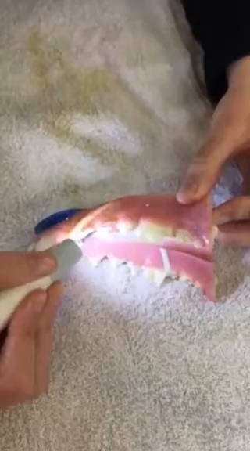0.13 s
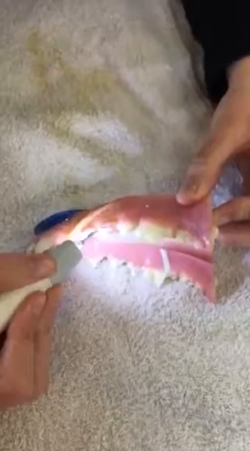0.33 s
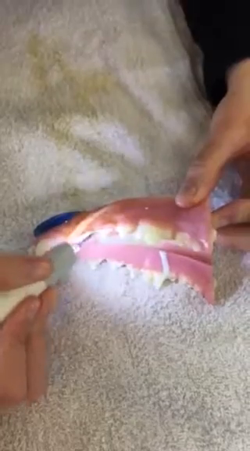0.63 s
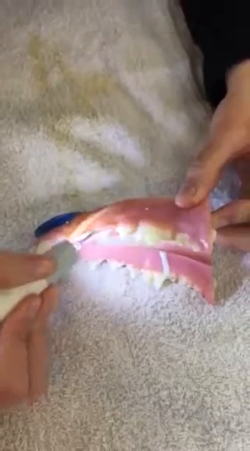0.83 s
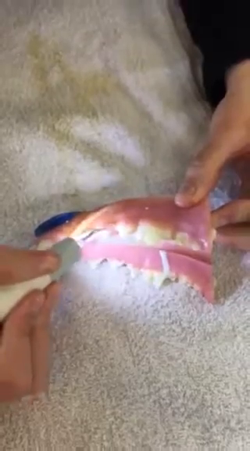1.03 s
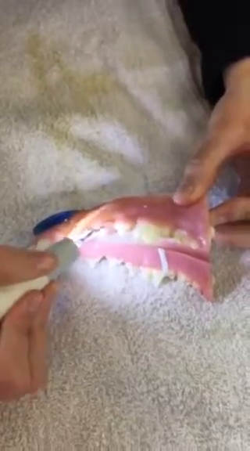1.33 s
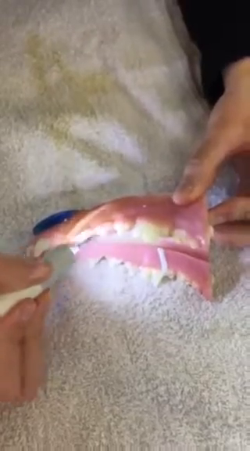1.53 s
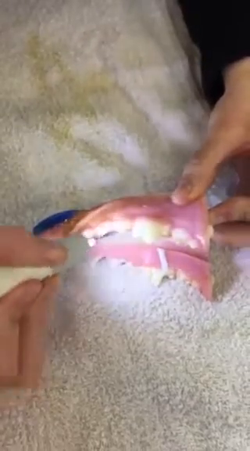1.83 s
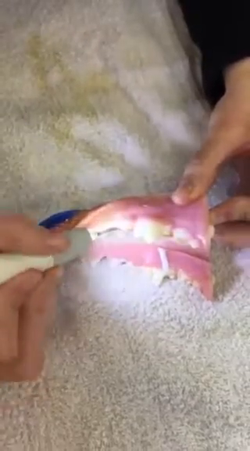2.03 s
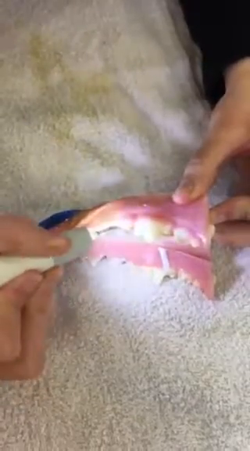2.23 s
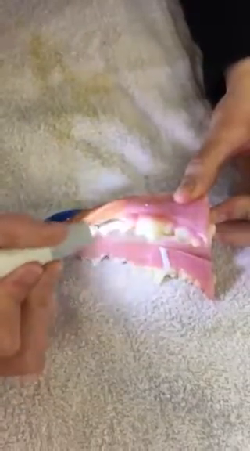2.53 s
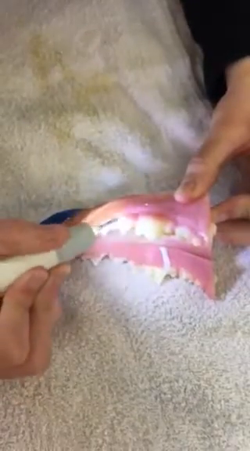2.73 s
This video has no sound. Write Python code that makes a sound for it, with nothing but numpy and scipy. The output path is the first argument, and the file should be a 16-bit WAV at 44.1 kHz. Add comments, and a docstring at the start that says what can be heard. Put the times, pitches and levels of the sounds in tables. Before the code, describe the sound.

Hissing, sputtering spray from an ultrasonic dental scaler, with short squeaks and soft handling bumps.

```python
"""An ultrasonic scaler works on a plastic tooth model lying on a towel, close to the microphone.
Its water spray hisses in a few resonances and spits about twenty times a second; water bubbles on the
model, and the tip squeals where it bites on a tooth. The hands rub and bump the model, brush over the
cloth and creak on the plastic, above a low room rumble."""
import sys
import numpy as np
from scipy import signal
from scipy.fft import rfft, irfft
from scipy.io import wavfile
from scipy.ndimage import map_coordinates

SR = 44100
rng = np.random.default_rng(int(sys.argv[2]) if len(sys.argv) > 2 else 0)


def digitize_waveform(pressure):
    """Quantize a signal to 16-bit integers and store it at the path in sys.argv[1].

    Rows of a 2-D input are taken as channels; values are limited to [-1, 1].
    """
    field = np.atleast_2d(pressure).T
    bounded = np.clip(field, -1, 1)
    quanta = np.round(bounded * 32767).astype(np.int16)
    wavfile.write(sys.argv[1], SR, quanta)


N = 127890
T = np.arange(N) / SR
FRAMES = dict(nperseg=1024, noverlap=768)


def amp(db):
    """Decibels to gain."""
    return 10 ** (np.asarray(db) / 20)


def unit(x):
    """Scales to rms 1."""
    return x / np.sqrt(np.mean(x ** 2) + 1e-20)


def fader(points):
    """Gain over time from (seconds, dB) points."""
    return amp(np.interp(T, *np.transpose(points)))


def add(mix, start, sound):
    """Mixes a sound in at start seconds."""
    part = mix[max(round(start * SR), 0):][:len(sound)]
    part += sound[:len(part)]


def noise(colour):
    """Noise of rms 1, shaped by (Hz, dB) points."""
    hz, db = np.transpose(colour)
    gain = amp(np.interp(np.log(np.fft.rfftfreq(N, 1 / SR) + 1), np.log(hz), db))
    return unit(irfft(rfft(rng.standard_normal(N)) * gain, N))


def drift(size, rate_hz):
    """Smooth random motion of rms about 1, up to about rate_hz."""
    padded = size + 8192
    hz = np.fft.rfftfreq(padded, 1 / SR)
    spectrum = rfft(rng.standard_normal(padded)) / (1 + (hz / rate_hz) ** 4)
    return unit(irfft(spectrum, padded))[:size]


def ring(hz, width_hz):
    """Noise in a resonance that follows the curve hz."""
    phase = 2 * np.pi * np.cumsum(hz) / SR
    return sum(drift(len(hz), width_hz / 2) * wave(phase) for wave in (np.cos, np.sin)) / np.sqrt(2)


def burst(t, length, rise_s, fall_s):
    """Attack, hold and exponential release."""
    return np.minimum(t / rise_s, 1) * np.exp(-np.maximum(t - length + fall_s / 2, 0) / fall_s)


def patchy(x, depth_db, width_hz, length_s):
    """Lets the colour of a sound shift in random patches of the given size."""
    hz, t, spectrum = signal.stft(x, SR, **FRAMES)
    grid = np.meshgrid(hz / width_hz, t / length_s, indexing="ij")
    patches = map_coordinates(rng.standard_normal((400, 400)), grid, order=3, mode="wrap")
    out = signal.istft(spectrum * amp(depth_db * np.minimum(patches, 1)), SR, **FRAMES)[1][:N]
    return unit(out) * np.std(x)


# Tone of the hiss. Each row: frequency in Hz, relative level in dB.
HISS_COLOUR = [(1000, -16), (2300, -11), (3000, -8), (3450, -9), (3900, -4), (4500, -2), (4900, -2),
               (5300, 2.5), (6250, -1), (6700, -4), (7500, -6), (8000, -9), (9000, -11), (10000, -20)]
# The spray's four resonances, low to high. Each row: centre in Hz, width in Hz.
SPRAY_RINGS = [(2950, 380), (5900, 620), (7140, 400), (8650, 950)]
# Swells of the hiss and of each resonance. Each row: time in seconds, relative level in dB.
HISS_FADER = [(0.0, -58.5), (0.11, -54), (0.44, -55.5), (0.46, -48), (0.54, -59.5), (1.16, -54.5),
              (1.18, -55), (1.19, -51), (1.57, -58), (2.47, -52.5), (2.6, -58), (2.9, -59)]
DEEP_FADER = [(0, -72), (.85, -72), (1.03, -59), (1.25, -72), (2.68, -72), (2.8, -58), (2.9, -62)]
LOW_FADER = [(0, -48.5), (.13, -48), (.42, -52.5), (.55, -44.5), (.78, -46.5), (1.15, -51), (1.25, -72),
             (1.53, -55.5), (1.8, -43.5), (2.0, -61), (2.25, -53), (2.5, -62), (2.65, -51), (2.9, -50.5)]
MID_FADER = [(0.0, -67), (0.51, -71), (0.62, -53), (1.1, -48), (1.17, -55.5), (1.61, -59), (1.65, -52.5),
             (1.84, -47.5), (1.86, -38), (1.87, -45.5), (2.08, -52), (2.19, -47.5), (2.56, -52),
             (2.65, -50), (2.75, -54), (2.9, -55)]
TOP_FADER = [(0, -57), (.08, -49.5), (.14, -54), (.19, -57), (.4, -58.5), (.52, -51), (.6, -70),
             (1.12, -67), (1.2, -50.5), (1.42, -54), (1.58, -53), (1.7, -67), (2.05, -62.5), (2.27, -64),
             (2.6, -65.5), (2.9, -58)]


def spray(hiss_db=3, rings_db=-0.5, wander_hz=30, flutter_db=1.7):
    """Fine mist: a fluttering hiss and four resonances that swell and wander as the tip moves."""
    hiss = fader(HISS_FADER) * patchy(noise(HISS_COLOUR), depth_db=3, width_hz=260, length_s=.06)
    rings = np.zeros(N)
    for swell, (hz, width) in zip((DEEP_FADER, LOW_FADER, MID_FADER, TOP_FADER), SPRAY_RINGS):
        rings += fader(swell) * ring(hz + wander_hz * drift(N, rate_hz=12), width)
    flutter = amp(flutter_db * drift(N, rate_hz=60))
    return (amp(hiss_db) * hiss + amp(rings_db) * rings) * flutter


# Steady notches in the treble. Each row: centre in Hz, width in Hz, gain in dB.
STEADY_NOTCHES = [(2680, 140, -4), (8000, 200, -3)]
# Drifting notches that give the hiss a hollow, swirling tone.
# Each row: time in seconds, centre in Hz, gain in dB.
HIGH_NOTCH = [(0, 6720, -18), (.5, 6650, -20), (.7, 6630, -22), (1.1, 6720, -16), (1.3, 6650, -3),
              (1.65, 6620, -13), (1.85, 6580, -10), (2.05, 6600, -2), (2.5, 6700, -1), (2.7, 6880, -3),
              (2.9, 6880, -4)]
MID_NOTCH = [(0, 4900, -6), (.31, 4830, -17), (.5, 4980, -14), (.7, 4920, -7), (.86, 4950, -11),
             (1.17, 4980, -3), (1.6, 4900, -3), (1.75, 4930, -13), (2.0, 4900, -3), (2.9, 4930, -5)]
LOW_NOTCH = [(0, 3400, -4), (.29, 3250, -17), (.43, 3400, -5), (.58, 3400, -17), (.71, 3300, -10),
             (.85, 3450, -4), (1.1, 3640, -14), (1.16, 3500, -1), (1.35, 3450, -2), (1.56, 3300, -10),
             (1.75, 3500, -3), (2.05, 3450, -2), (2.55, 3500, -7), (2.84, 3580, -16)]
# Upper edge of the spray. Each row: time in seconds, start of the roll-off in Hz.
TREBLE_EDGE = [(0, 8840), (.5, 9230), (.73, 9400), (.8, 8140), (1.1, 8650), (1.22, 9060), (1.58, 9040),
               (1.7, 8200), (1.85, 8930), (2.1, 8800), (2.9, 9200)]


def hollowed(x, edge_db_per_hz=0.1, max_rolloff_db=14):
    """Filters the hiss, spits and squeals with steady and drifting notches and a moving treble roll-off."""
    hz, t, spectrum = signal.stft(x, SR, **FRAMES)
    hz = hz[:, None]
    notches = list(STEADY_NOTCHES)
    for sweep, width_hz in ((HIGH_NOTCH, 190), (MID_NOTCH, 150), (LOW_NOTCH, 185)):
        times, centre, db = np.transpose(sweep)
        notches.append((np.interp(t, times, centre), width_hz, np.interp(t, times, db)))
    notch_db = sum(db * np.exp(-((hz - centre) / width) ** 2) for centre, width, db in notches)
    above_edge_hz = np.maximum(hz - np.interp(t, *np.transpose(TREBLE_EDGE)), 0)
    rolloff_db = np.minimum(edge_db_per_hz * above_edge_hz, max_rolloff_db)
    return signal.istft(spectrum * amp(notch_db - rolloff_db), SR, **FRAMES)[1][:N]


# Swell of the room rumble. Each row: time in seconds, level in dB.
RUMBLE_FADER = [(0, -48), (.07, -54.5), (.21, -48.5), (.29, -55), (.45, -51.5), (.6, -55), (.8, -50.5),
                (.95, -52), (1.12, -51), (1.2, -55.5), (1.33, -50), (1.45, -50.5), (1.56, -47),
                (1.7, -55.5), (1.85, -52.5), (2.0, -51), (2.2, -53.5), (2.45, -50), (2.53, -54.5),
                (2.72, -54.5), (2.9, -52)]
# Its tone. Each row: frequency in Hz, relative level in dB.
RUMBLE_COLOUR = [(20, -24.5), (35, -13), (50, -2), (72, 1.5), (120, -2), (200, -9.5), (400, -23),
                 (1000, -34.5), (3000, -60.5)]


def room_rumble():
    """A low bed of room noise that rises and sinks."""
    return fader(RUMBLE_FADER) * noise(RUMBLE_COLOUR)


# How busy the hands are; drives rub, patter and bubbles. Each row: time in seconds, relative level in dB.
HANDLING = [(0, -54), (.17, -57.5), (.35, -60.5), (.62, -59.5), (.8, -53.5), (.92, -60), (1.05, -47.5),
            (1.2, -61.5), (1.42, -51.5), (1.6, -55), (1.75, -68.5), (1.9, -54), (2.03, -50.5),
            (2.35, -50.5), (2.55, -51), (2.7, -59.5), (2.9, -54.5)]
# Tone of the rub. Each row: frequency in Hz, relative level in dB.
RUB_COLOUR = [(80, -9.5), (200, 1.5), (350, 0), (600, -5), (1100, -14.5), (2000, -17), (4000, -13.5),
              (9000, -44)]


def finger_rub(gain_db=-2, lumps_db=3):
    """Fingers rub unevenly on the model as they hold it."""
    rub = patchy(noise(RUB_COLOUR), depth_db=4.5, width_hz=130, length_s=.04)
    lumps = amp(lumps_db * drift(N, rate_hz=50))
    return amp(gain_db) * fader(HANDLING) * rub * lumps


def knock(drop_s, peak_s, top_hz=944, thud_hz=74):
    """A soft knock whose pitch drops quickly into a thud."""
    t = T[:3072]
    hz = thud_hz + (top_hz - thud_hz) * np.exp(-t / drop_s)
    envelope = t / peak_s * np.exp(1 - t / peak_s)
    return envelope * np.sin(2 * np.pi * np.cumsum(hz) / SR)


def patter(gain_db=6, taps_per_s=35):
    """Tiny random knocks, louder as the hands get busier."""
    taps = (rng.random(N) < taps_per_s / SR) * rng.uniform(-1, 1, N) * fader(HANDLING)
    return amp(gain_db) * signal.oaconvolve(taps, knock(drop_s=.003, peak_s=.002))[:N]


def blip(length, pitch, glide_per_s=2):
    """One bubble: a short, softly starting note that rises a little."""
    t = T[:3072]
    cycles = np.cumsum(pitch * np.exp(glide_per_s * (t - length / 2))) / SR
    return np.sqrt(2) * np.sin(2 * np.pi * cycles) * burst(t, length, rise_s=.005, fall_s=.006)


# Clear wet blips. Each row: start in seconds, length in seconds, pitch in Hz, level in dB.
BLIPS = [(.003, .018, 205, -43), (.052, .018, 610, -58), (.42, .014, 230, -54), (.605, .016, 800, -59),
         (.765, .016, 650, -58), (1.403, .03, 340, -52)]


def bubbles(faint_per_s=30, faint_db=-14, faint_s=.01, low_hz=220, high_hz=1000):
    """Water bubbles on the model: a few clear blips, and many faint ones that follow the handling."""
    out, stir = np.zeros(N), fader(HANDLING)
    for start, length, pitch, db in BLIPS:
        add(out, start, amp(db) * blip(length, pitch))
    for when, height, strength in rng.random((round(faint_per_s * N / SR), 3)):
        at = int(when * N)
        pitch = low_hz * (high_hz / low_hz) ** height
        gain = amp(faint_db) * stir[at] * 2 * strength * np.sqrt(low_hz / pitch)
        add(out, at / SR, gain * blip(faint_s, pitch))
    return out


# Spits of water. Each row: start in seconds, length in seconds, puff pitch in Hz,
# its relative level in dB, pop pitch in Hz, its relative level in dB.
SPITS = [(.006, .008, 4240, -50, 2100, -49), (.058, .008, 4100, -52, 2000, -52),
         (0.08, 0.016, 4020, -48, 2200, -53), (.118, .028, 4000, -47, 2050, -45),
         (0.181, 0.011, 3970, -49, 2500, -52), (0.382, .008, 4500, -48, 2600, -56),
         (0.413, 0.015, 4330, -49, 2600, -55), (0.531, 0.0086, 4600, -51, 2500, -50),
         (.562, .006, 4700, -48, 2400, -60), (0.619, 0.0092, 4500, -48, 2300, -55),
         (.65, .007, 4400, -48, 2500, -59), (0.674, .008, 4180, -53, 2000, -54),
         (0.723, 0.011, 4450, -48, 2350, -49), (0.763, 0.0068, 4600, -48, 2200, -46),
         (0.806, 0.0049, 4240, -47, 2100, -48), (0.841, 0.0074, 4040, -50, 1950, -51),
         (.885, 0.0074, 4570, -49, 2700, -52), (.904, .008, 4000, -52, 2250, -50),
         (0.928, 0.0086, 4630, -47, 2400, -50), (0.971, 0.01, 3860, -48, 3000, -54),
         (1.016, .008, 5500, -49, 3000, -48), (1.09, .008, 4200, -48, 2950, -51),
         (1.138, .008, 5320, -48, 2950, -51), (1.239, .012, 5030, -44, 2500, -51),
         (1.293, 0.008, 5200, -45, 2500, -51), (1.346, 0.014, 4890, -42, 2500, -48),
         (1.416, .008, 4740, -49, 2400, -52), (1.447, .008, 4410, -46, 2600, -52),
         (1.498, 0.0095, 4900, -45, 2450, -50), (1.588, 0.0094, 4700, -48, 2500, -52),
         (1.632, 0.009, 4850, -44, 3250, -45), (1.675, 0.019, 4540, -46, 2500, -52),
         (1.714, .034, 4050, -40, 3500, -49), (1.755, .008, 3980, -65, 2900, -57),
         (1.808, .006, 4300, -54, 2800, -53), (1.842, .026, 3700, -42, 2600, -48),
         (1.88, 0.0092, 3900, -43, 2700, -52), (1.942, 0.0056, 4800, -47, 2400, -48),
         (1.985, 0.01, 4650, -47, 2500, -52), (2.046, 0.0091, 4950, -44, 2600, -51),
         (2.127, 0.0073, 5080, -45, 2600, -52), (2.158, 0.013, 3900, -47, 2500, -53),
         (2.525, 0.0052, 4820, -40.5, 2400, -52), (2.567, .008, 4700, -49, 2400, -53),
         (2.648, .007, 4800, -42, 2150, -46), (2.661, .005, 5000, -44, 2300, -54),
         (2.693, 0.0068, 4070, -41, 2300, -54), (2.746, .01, 4500, -47, 2200, -53),
         (2.776, 0.0087, 4460, -47, 2100, -54), (2.827, .01, 4600, -42, 2250, -47),
         (2.871, .006, 4630, -45, 2100, -53)]
# Tone of the crackle inside each spit. Each row: frequency in Hz, relative level in dB.
CRACKLE_COLOUR = [(1200, -40), (2200, -15), (3000, -14), (3800, -2), (4500, 2), (5400, -2), (7300, -6),
                  (8500, -18)]


def spits(gain_db=-1, sag_per_s=6, pop_s=.007, crackle_db=-6, snaps_per_s=600, snap_s=.0005):
    """Drops burst off the tip: a puff in a sagging resonance, a lower pop and a faint crackle."""
    out, crackle_envelope, t = np.zeros(N), np.zeros(N), T[:2560]
    edges = dict(rise_s=.003, fall_s=.0025)
    for start, length, puff_hz, puff_db, pop_hz, pop_db in SPITS:
        sag = np.exp(-sag_per_s * (t - length / 2))
        envelope = amp(puff_db) * burst(t, length, **edges)
        puff = envelope * ring(puff_hz * sag, width_hz=820 + 9000 * length)  # long spits rasp wider
        pop = amp(pop_db) * ring(pop_hz * sag, width_hz=560) * burst(t, pop_s, **edges)
        add(out, start, puff + pop)
        add(crackle_envelope, start, envelope)
    triggers = 1. * (rng.random(N) < snaps_per_s / SR)
    snaps = signal.oaconvolve(triggers, np.exp(-t / snap_s))[:N]
    crackle = unit((.5 + snaps) * noise(CRACKLE_COLOUR))  # snaps over an even fizz
    return amp(gain_db) * out + amp(crackle_db) * crackle_envelope * crackle


# Bites of the tip. Each row: start in seconds, length in seconds, pitches of modes two to four in Hz,
# relative levels of all four modes in dB, extra rasp in dB.
SQUEALS = [(.115, .038, 4070, 6110, 8400, -62, -57, -53, -45, 0),
           (.235, .01, 4040, 5920, 8530, -56, -42, -37, -38, 0),
           (.286, .045, 3880, 5830, 8560, -57.5, -46, -42.5, -40.5, 1),
           (.301, .019, 4190, 5970, 8380, -45, -29, -27, -33, -2),
           (.341, .011, 4100, 6120, 8300, -68, -52, -37.5, -42, 0),
           (.447, .025, 4410, 5720, 8720, -62, -39, -39, -39, 7),
           (.455, .007, 4130, 5970, 8420, -54, -35, -28, -39, 4),
           (.461, .012, 4133, 5970, 8420, -55, -29, -34, -37, 4),
           (.492, .01, 3900, 5750, 8520, -55, -34, -35, -31, 6),
           (.496, .023, 4150, 6030, 8320, -57, -41, -28, -35, 2),
           (1.171, .0099, 3607, 4770, 8400, -66, -29.5, -40, -29, -2),
           (1.182, .023, 3640, 5970, 8370, -70, -59, -57, -45, -4)]
# Rasp around each mode, low to high. Each row: level against the tone in dB before the extra, width in Hz.
MODE_RASP = [(-3, 450), (-7, 720), (-13, 620), (-9, 850)]


def squeals(gain_db=-3.7, first_hz=2430, wander_hz=45, roughness=.41, chatter_db=1.3):
    """The tip chatters on a tooth: four wavering modes, each a tone with a rough skirt and wider rasp."""
    out, t = np.zeros(N), T[:4096]
    for start, length, second_hz, third_hz, fourth_hz, *mode_db, extra_db in SQUEALS:
        modes = np.zeros(len(t))
        mode_hz = (first_hz, second_hz, third_hz, fourth_hz)
        for hz, db, (rasp_db, rasp_width) in zip(mode_hz, mode_db, MODE_RASP):
            pitch = hz + wander_hz * drift(len(t), rate_hz=110)
            tone = np.sqrt(2) * np.sin(2 * np.pi * (np.cumsum(pitch) / SR + rng.random()))
            skirt = roughness * ring(pitch, width_hz=340)
            rasp = amp(rasp_db + extra_db) * ring(pitch, rasp_width)
            modes += amp(db) * unit(tone + skirt + rasp)
        chatter = amp(chatter_db * drift(len(t), rate_hz=250))
        add(out, start, modes * chatter * burst(t, length, rise_s=.0034, fall_s=.0052))
    return amp(gain_db) * out


# Strokes over the towel. Each row: start in seconds, rise in seconds, decay in seconds, level in dB.
BRUSHES = [(.13, .01, 0.039, -50.5), (0.881, 0.025, 0.042, -50), (1.0, .02, 0.066, -54),
           (1.39, 0.023, 0.022, -51), (1.97, 0.031, 0.28, -51), (2.238, .013, .044, -32),
           (2.31, 0.035, 0.055, -44.5), (2.419, .014, .052, -33.3)]
# Tone of the cloth. Each row: frequency in Hz, relative level in dB.
CLOTH_COLOUR = [(50, -22), (150, 6.5), (300, -1), (600, -.5), (1200, -3.5), (1800, -1), (2400, -4.5),
                (2900, -4), (3200, -14), (4300, -14.5), (6000, -20), (8600, -23), (9500, -36)]
# Resonances of the model and table. Each row: centre in Hz, width in Hz, relative level in dB.
BODY_RINGS = [(169.3, 36, -0.5), (329, 30, -0.5), (562, 19, -4.5), (702, 22, -4.5), (820, 20, -0.5),
              (960, 21, -3.5), (1033, 16, -3.5), (1500, 18, -2), (1636, 20, -3.5), (1687, 16, -6.5),
              (1978, 26, -3.5), (2090, 25, -1), (2468, 16, -4)]


def cloth_brushes(grain_db=2, body_db=-11):
    """Hands brush the cloth: grainy swishes that swell fast, ring in the model and table, and fade."""
    power = np.zeros(N)
    for start, rise, decay, db in BRUSHES:
        stroke = amp(db) * np.minimum(T / rise, 1) * np.exp(-np.maximum(T - rise, 0) / decay)
        add(power, start, stroke ** 2)
    cloth = patchy(noise(CLOTH_COLOUR), depth_db=4, width_hz=170, length_s=.025)
    body = sum(amp(db) * ring(np.full(N, hz), width) for hz, width, db in BODY_RINGS)
    grain = amp(grain_db * drift(N, rate_hz=170))
    return np.sqrt(power) * unit(cloth * grain + amp(body_db) * body)


# Knocks on the model. Each row: start in seconds, level in dB, time constant of the pitch drop in seconds.
BUMPS = [(.484, -45, .003), (.86, -42, 0.0026), (.882, -39.5, 0.0032), (.892, -40, .002),
         (0.906, -41, 0.0031), (.923, -42.5, 0.0036), (.932, -39.5, 0.00287), (1.019, -43, 0.0025),
         (1.285, -41, 0.0017), (1.296, -51, 0.0018), (1.41, -44, 0.0029), (1.497, -43, 0.0021),
         (1.587, -41.5, 0.0021), (1.634, -40, 0.0033), (1.979, -38.5, 0.0027), (1.993, -39, 0.0021),
         (2.15, -40.5, 0.0029), (2.182, -39, .003), (2.264, -40, .003), (2.441, -39, 0.0028),
         (2.59, -41, .003), (2.777, -36.5, 0.0029), (2.873, -41, 0.0026), (2.886, -37.5, 0.0027)]


def bumps():
    """The hands knock the model with soft thuds."""
    out = np.zeros(N)
    for start, db, drop_s in BUMPS:
        add(out, start, amp(db) * knock(drop_s, peak_s=.005))
    return out


# Finger slips. Each row: start in seconds, length in seconds, pitch in Hz, level in dB.
CREAKS = [(1.396, .045, 336, -55), (2.023, 0.049, 361, -49)]


def creaks(glide_per_s=2.8):
    """A finger slips on the plastic with a faint rising note."""
    out, t = np.zeros(N), T[:6000]
    for start, length, pitch, db in CREAKS:
        note = ring(pitch * np.exp(glide_per_s * (t - length / 2)), width_hz=38)
        add(out, start, amp(db) * note * burst(t, length, rise_s=.012, fall_s=.012))
    return out


def scene():
    """All sources at one close microphone."""
    scaler = hollowed(spray() + spits() + squeals())
    hands = bumps() + patter() + cloth_brushes() + creaks() + finger_rub()
    return (scaler + hands + room_rumble() + bubbles())[None]


def record(dry, cutoff_hz=9800):
    """A steep low-pass takes the top off the mix."""
    lowpass = signal.firwin(201, cutoff_hz, window=("kaiser", 8), fs=SR)
    return signal.oaconvolve(dry, lowpass[None], "same")


dry = scene()
out = record(dry)
digitize_waveform(out)
```